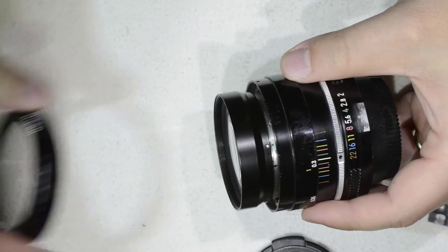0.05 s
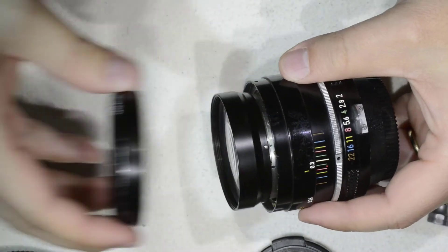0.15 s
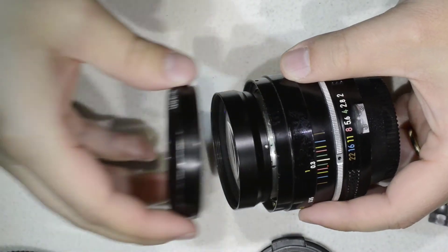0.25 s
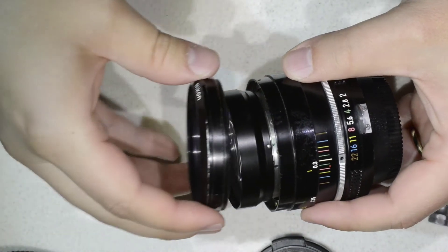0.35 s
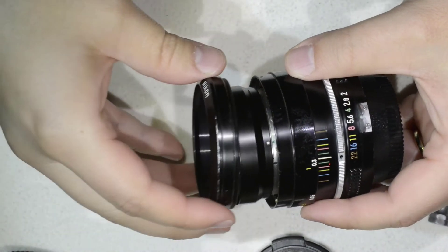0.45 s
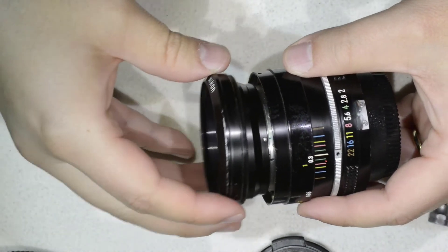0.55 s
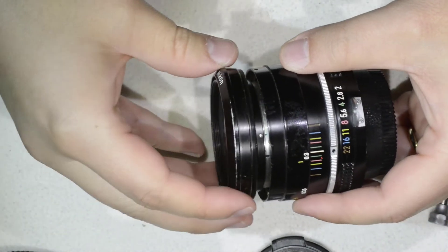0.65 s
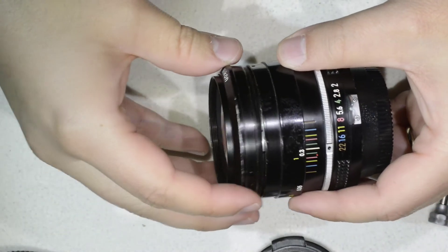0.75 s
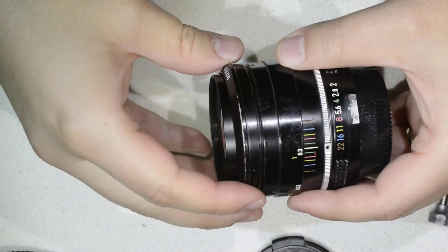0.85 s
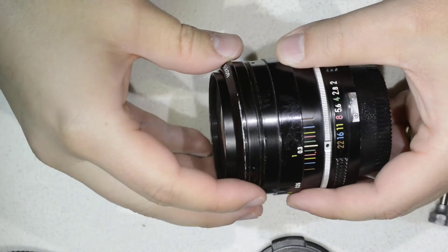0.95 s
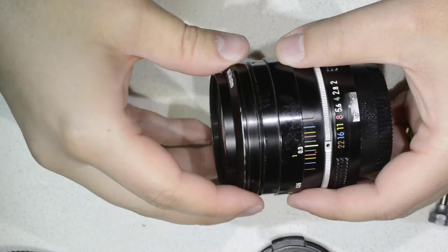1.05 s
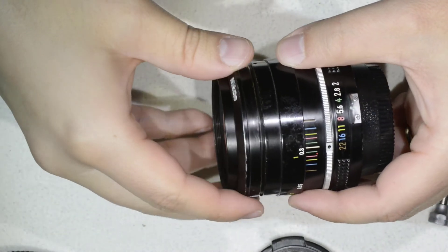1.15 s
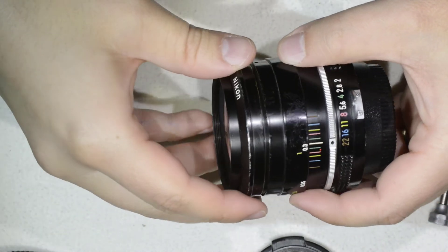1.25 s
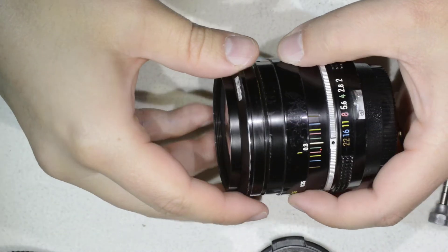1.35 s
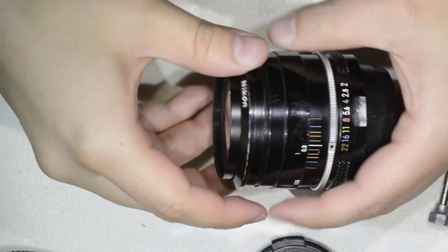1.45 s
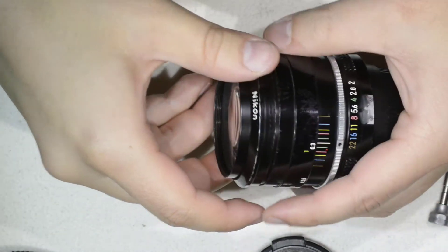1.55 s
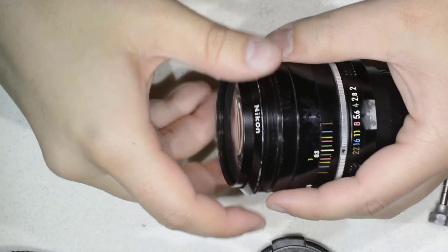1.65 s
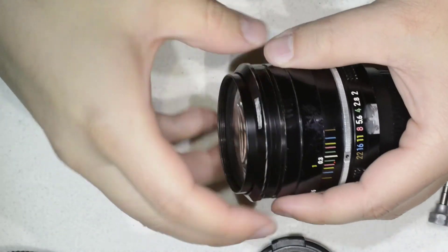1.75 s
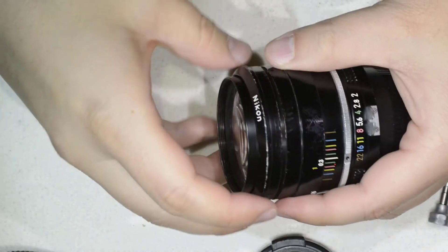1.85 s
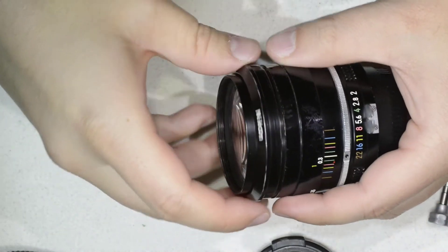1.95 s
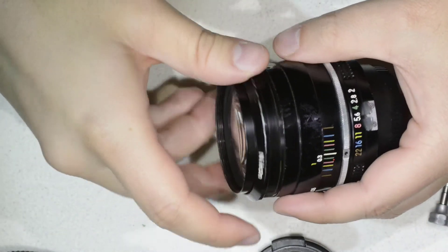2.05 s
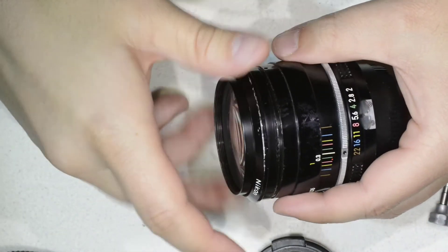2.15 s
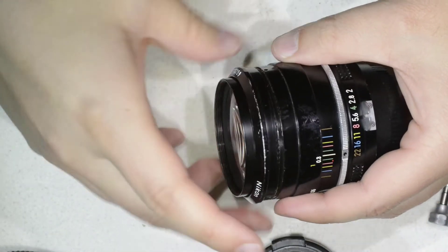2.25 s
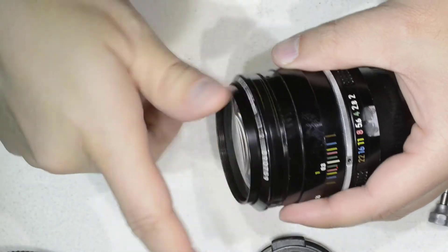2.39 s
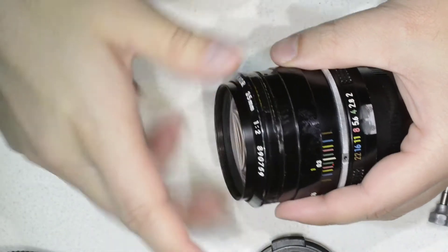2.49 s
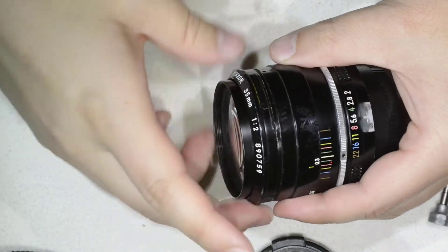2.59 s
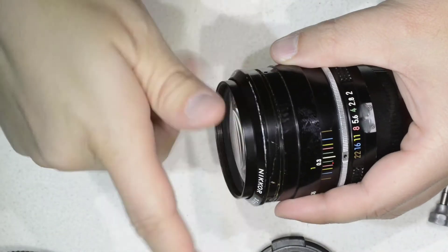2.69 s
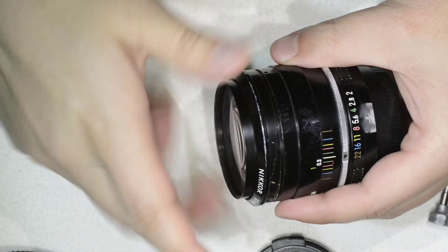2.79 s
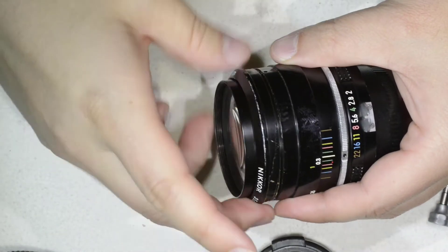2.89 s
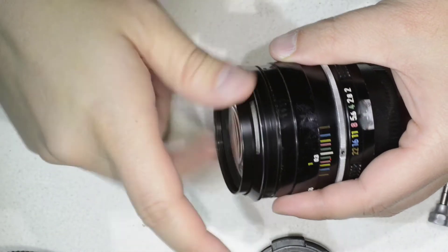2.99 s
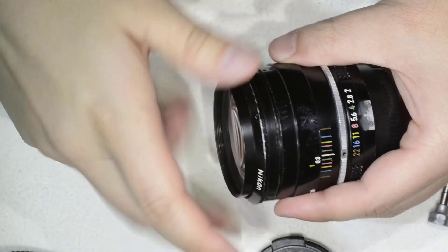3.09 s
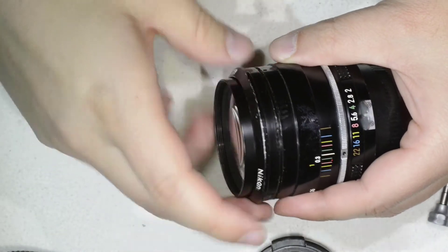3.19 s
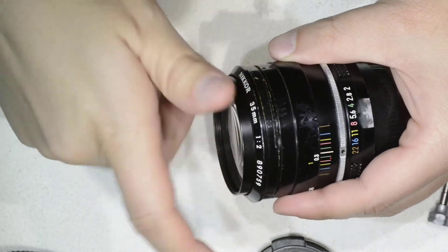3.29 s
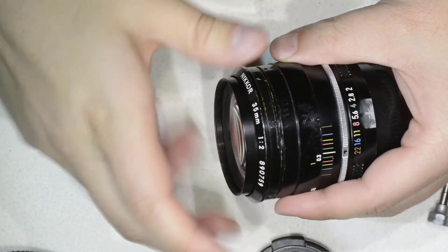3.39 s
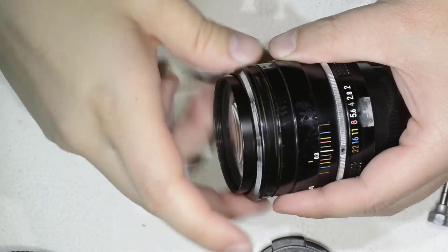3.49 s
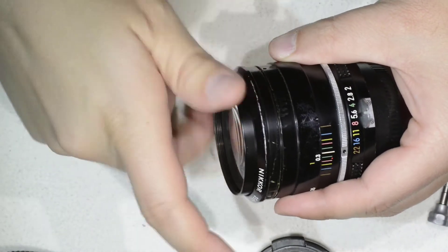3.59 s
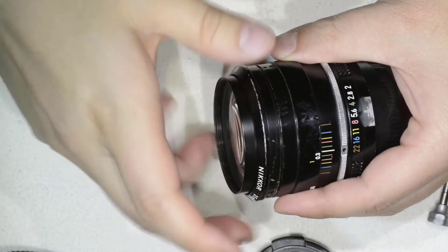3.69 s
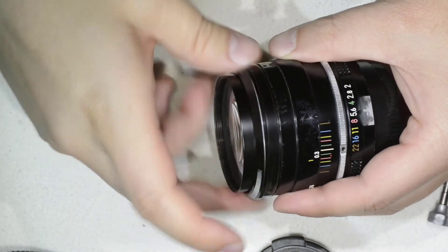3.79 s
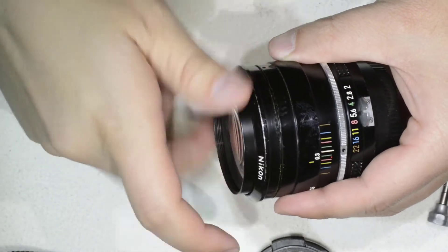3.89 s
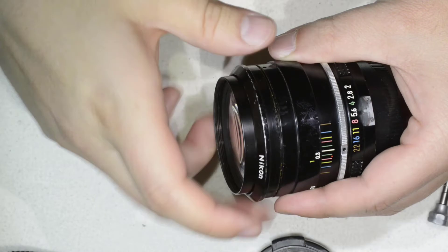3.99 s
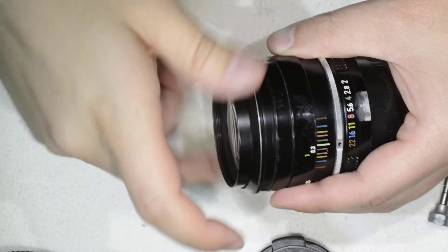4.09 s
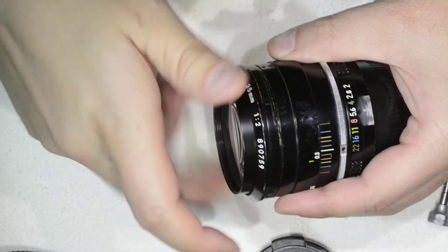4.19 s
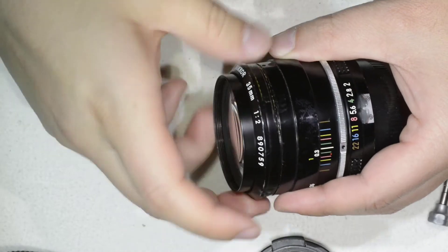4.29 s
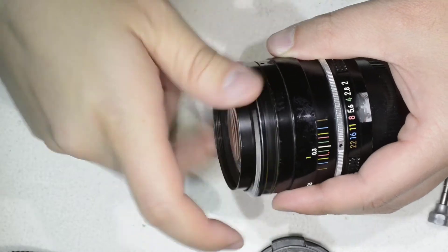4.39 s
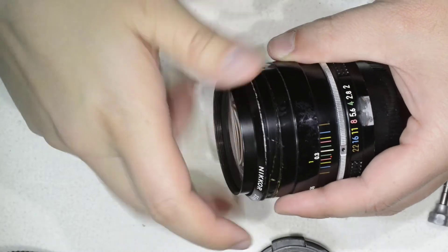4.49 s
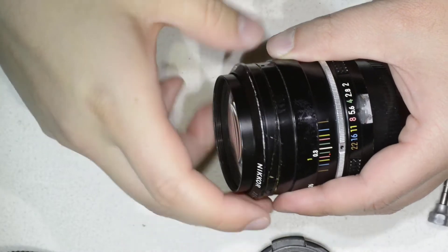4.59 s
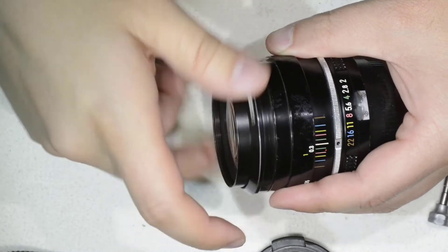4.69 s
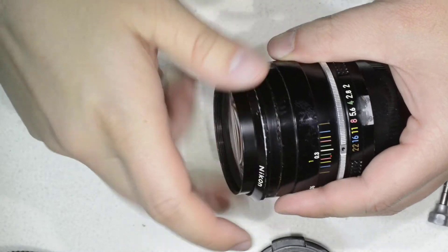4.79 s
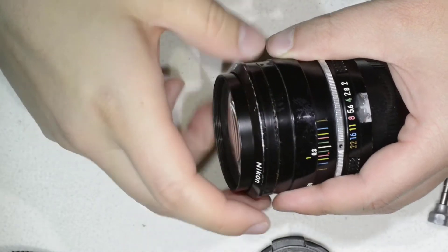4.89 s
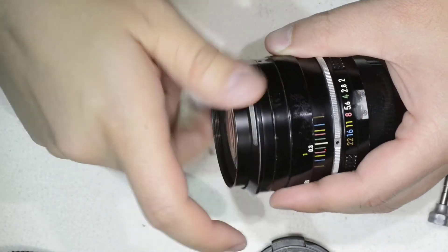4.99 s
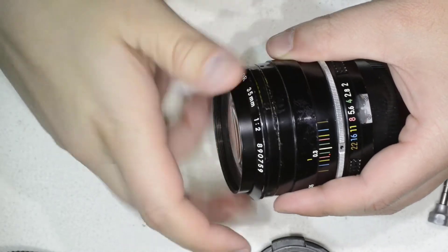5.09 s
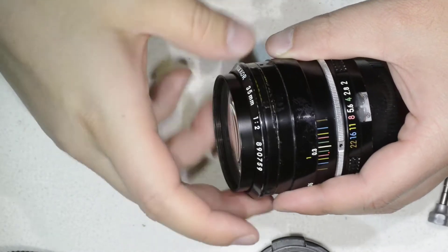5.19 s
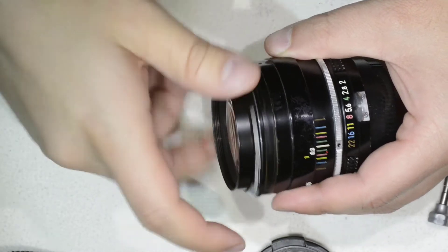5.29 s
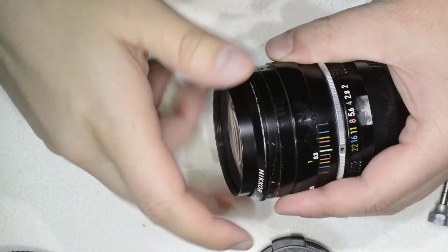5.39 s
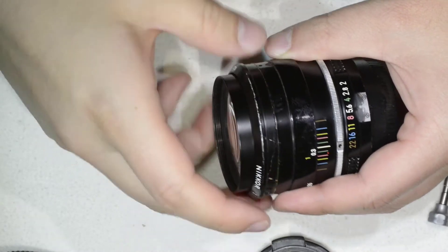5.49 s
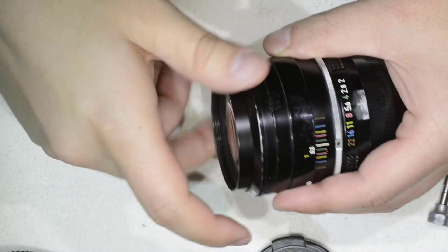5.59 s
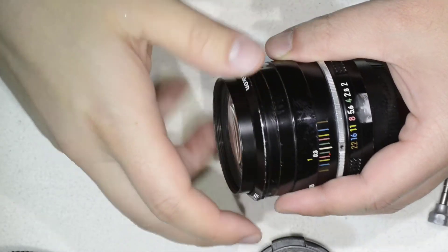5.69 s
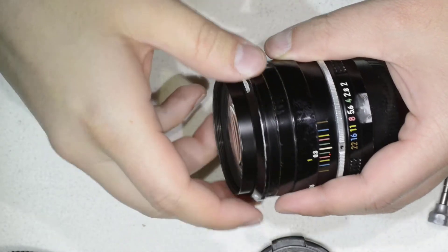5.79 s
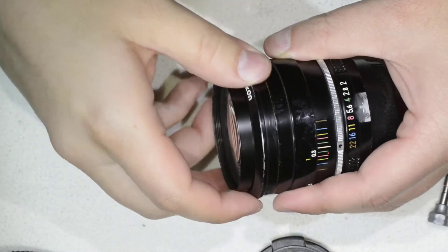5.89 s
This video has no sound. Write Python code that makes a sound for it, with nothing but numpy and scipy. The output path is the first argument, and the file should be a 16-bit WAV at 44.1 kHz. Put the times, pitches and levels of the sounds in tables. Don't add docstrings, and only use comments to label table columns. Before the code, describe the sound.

Short metallic zips jam with sharp rattling clicks as a ring is flicked round on a lens barrel, ending in lighter scrapes.

```python
import sys
import numpy as np
from scipy import signal
from scipy.fft import rfft, irfft, next_fast_len
from scipy.io import wavfile
from scipy.ndimage import uniform_filter1d, map_coordinates

SR = 44100
rng = np.random.default_rng(int(sys.argv[2]) if len(sys.argv) > 2 else 0)


def store_wav(level_fs):
    pcm = np.round(np.clip(np.atleast_2d(level_fs), -1, 1) * 32767)
    wavfile.write(sys.argv[1], SR, pcm.T.astype(np.int16))


def linear_from_db(decibels):
    return 10 ** (np.asarray(decibels, float) / 20)


N = 262251
SIZE = 2 ** 12
HZ = np.fft.rfftfreq(SIZE, 1 / SR)

# mode_hz, width_hz, level_db
SEATED_MODES = [(1704, 220, 0), (2070, 140, 9), (2385, 50, 5), (3340, 130, 0.5), (4040, 69, 2),
                (4650, 300, 2.5), (5500, 340, 4.5), (5460, 280, -9.5), (6790, 260, 3), (8830, 850, 10),
                (9670, 580, -0.5), (12230, 310, 9), (14800, 250, 15)]
HIT_SCATTER = 0.58


def unit(x):
    return x / np.sqrt(np.mean(np.abs(x) ** 2, axis=-1, keepdims=True) + 1e-20)


def along(points, hz):
    f, v = np.transpose(points)
    return np.interp(np.log(hz + 1), np.log(f + 1), v)


def wobble(rate, count):
    knots = rng.standard_normal(int(count * rate / SR) + 4)
    return map_coordinates(knots, [np.arange(count) * rate / SR])


def rush(spectrum, side_db):
    m = next_fast_len(N)
    colour = linear_from_db(along(spectrum, np.fft.rfftfreq(m, 1 / SR)))
    mid, side = irfft(rfft(rng.standard_normal((2, m))) * colour, m)[:, :N]
    return unit(np.array([mid + linear_from_db(side_db) * side, mid - linear_from_db(side_db) * side]))


def background():
    # band_hz, density_db
    rumble_spectrum = [(12, -8.5), (25, -1), (150, -5), (280, -14), (500, -31.5)]
    murmur_spectrum = [(120, -20), (280, -4.5), (460, -3.5), (700, -6), (1500, -25), (3000, -29.5)]
    hiss_spectrum = [(500, -7.5), (1600, -2.5), (4000, -5.5), (8000, -6.5), (12800, 0.5), (16000, -5)]
    # partial_hz, level_db
    hum_partials = [(29.97, -66), (59.94, -70.5), (89.91, -74.5), (119.88, -85.5), (149.85, -79)]
    # centre_s, half_length_s, lift_db
    sweeps = [
        (0.37, 0.22, 8.5),
        (2.502, 0.45, 7.5),
        (4.29, 0.14, 14.5),
    ]
    # start_s, dip_db
    ducks = [
        (2.39, 11.5),
        (2.67, 16),
        (3.27, 6),
        (3.56, 4),
        (3.86, 5.5),
        (4.13, 8.5),
        (4.41, -1),
    ]
    recover_s = 0.13
    t = np.arange(N) / SR
    duck_db = -sum(db * (t > s) * np.exp(-np.abs(t - s) / recover_s) for s, db in ducks)
    sweep_db = sum(db * np.exp(-((t - s) / half) ** 2) for s, half, db in sweeps)
    rumble = linear_from_db(-66.5 + 1.6 * wobble(2.7, N)) * rush(rumble_spectrum, -9)
    murmur = linear_from_db(-78 + sweep_db + 1.0 + 0.55 * wobble(3.9, N)) * rush(murmur_spectrum, -10)
    hum = sum(linear_from_db(db - 1.0 + 2.6 * wobble(2.6, N)) * np.sin(2 * np.pi * hz * t) for hz, db in hum_partials)
    return linear_from_db(duck_db) * (rumble + murmur + hum) + linear_from_db(-67.5) * rush(hiss_spectrum, -1)


def causal(db):
    cep = irfft(np.log(linear_from_db(db) + 1e-6), SIZE)
    cep[1:SIZE // 2] *= 2
    cep[SIZE // 2 + 1:] = 0
    return np.exp(rfft(cep))


def parts(foot_hz, low_hz, high_hz):
    # band_hz, level_db
    metal = [(120, -51.5), (200, -25.5), (440, -18), (968, -13.5), (1560, -11.5), (2910, -5), (3250, 0),
             (3760, -4), (5630, -1), (9060, -10), (14900, -24), (16000, -32.5)]

    def over(hz):
        return -10 * np.log10(1 + (hz / (HZ + 1)) ** 8)

    def under(hz):
        return -10 * np.log10(1 + (HZ / hz) ** 8)

    middle, low, high = over(low_hz) + under(high_hz), over(foot_hz) + under(low_hz), over(high_hz)
    return np.array([causal(along(metal, HZ) + cut) for cut in (middle, low, high)])


def chances(count):
    return rng.standard_normal((count, 2, len(SEATED_MODES)))


def resonance(centre_hz, width_hz, db):
    return linear_from_db(db) * 1j * HZ * width_hz / (centre_hz * centre_hz - HZ * HZ + 1j * HZ * width_hz)


def add(out, s, force, split, ring_db, extra, luck):
    # mode_hz, width_hz, level_db
    loose_modes = [(1925, 290, 34), (3470, 77, 20), (4540, 123, 34.5), (5270, 180, 23), (7000, 130, -32),
                   (8130, 180, 31), (10100, 1300, 26)]
    seated_from_s = 0.72
    modes = np.array(loose_modes if s < seated_from_s else SEATED_MODES)
    luck = luck[:, :len(modes)]
    modes = modes + np.transpose([0.008 * modes[:, 0] * luck[0], 0 * luck[0], 2.2 * luck[1]])
    ring = sum(resonance(*mode) for mode in modes)
    spot = resonance(*extra)
    push = rfft(force, SIZE)
    for row, body in zip(out, (ring + spot, 1.1 * ring + 0.46 * spot)):
        place = row[round(s * SR):][:SIZE]
        response = unit(split * (1 + linear_from_db(ring_db) * body))
        place += irfft(np.sum(push * response, axis=0), SIZE)


def grit(count, rough_db, rate):
    return unit(rng.standard_normal((3, count)) * linear_from_db(rough_db * wobble(rate, count)))


def patchy(x, depth_db):
    z = signal.stft(x, nperseg=256)[2]
    field = rng.standard_normal(z.shape[1:])
    field = uniform_filter1d(uniform_filter1d(field, size=5, axis=0), size=6, axis=1)
    return signal.istft(z * linear_from_db(depth_db * field / field.std()), nperseg=256)[1][:, :N]


def scraping():
    # loudest_s, swell_s, fade_s, scrape_db, base_hz (favoured spot rings
    rubs = [(0.426, 0.089, 0.013, -62, 5000), (0.447, 0.0093, 0.11, -64.5, 4550),
            (0.604, .045, 0.013, -53, 4660), (.632, 0.011, 0.039, -48.5, 4530),
            (.74, 0.037, 0.011, -57, 4650), (1.022, 0.059, 0.03, -48.5, 5480),
            (1.37, 0.13, 0.14, -62, 5500), (1.475, .03, 0.078, -64.5, 3400),
            (1.659, .06, 0.094, -62.5, 4600), (1.754, 0.063, 0.061, -51.5, 4650),
            (1.991, 0.18, 0.17, -60, 5560), (2.096, 0.15, 0.071, -52, 5470),
            (2.272, 0.083, .008, -55, 4000), (2.336, 0.041, 0.032, -35.5, 5000),
            (4.648, 0.043, .06, -37, 4040), (4.96, 0.072, 0.069, -34, 4660),
            (5.285, 0.094, 0.043, -37, 5300), (5.535, 0.048, 0.024, -38, 4650),
            (5.794, 0.024, 0.13, -70.5, 3630)]
    # stop_s, run_up_s, spin_s, scrape_db, base_hz (spot near 1.5 times
    flicks = [
        (2.39, 0.016, .018, -23.5, 4500),
        (2.664, 0.028, 0.03, -29.5, 3384),
        (3.012, 0.043, 0.075, -35.5, 5300),
        (3.258, 0.027, 0.037, -31.5, 4400),
        (3.556, 0.049, 0.042, -35.5, 4800),
        (3.854, 0.051, .046, -31.5, 4500),
        (4.122, 0.061, 0.042, -33, 5300),
        (4.402, 0.042, 0.057, -33.5, 4970),
        (4.72, 0.052, 0.02, -40.5, 5100),
    ]
    stop_s, climb_db, body_db = 0.024, -1, -22
    free_body_db = body_db - 11
    strokes = [(s, rise, spin, stop_s, db, hz, climb_db, body_db) for s, rise, spin, db, hz in flicks]
    strokes += [(s, rise, 0, fall, db, hz, 0, free_body_db) for s, rise, fall, db, hz in rubs]
    out, split = np.zeros((2, N + SIZE)), parts(230, 1377, 8320)
    hop = SR // 40
    fade = signal.get_window("hann", 2 * hop)
    t = np.arange(-12 * hop, 8 * hop) / SR
    for s, rise, spin, fall, db, hz, climb, low_db in strokes:
        away = np.maximum(np.maximum((-t - spin) / rise, t / fall), 0)
        progress = np.clip(0.5 + t / max(spin, 1e-3), -0.5, 0.5)
        touch_db = db - 24 * away ** 1.356 + climb * progress
        level_db = touch_db + 1.3 * wobble(80, len(t))
        low_part_db = low_db - 0.2278 * (touch_db + 41.5)
        high_part_db = -3 - 0.2174 * (touch_db + 48.5)
        gains = linear_from_db(level_db - 1.5 + np.array([0 * t, low_part_db, high_part_db]))
        force = np.clip(4 - 3 * away, 0, 1) * gains * grit(len(t), 1.8, 300)
        for k, luck in zip(range(0, len(t) - hop, hop), chances(count=19)):
            piece = force[:, k:k + 2 * hop]
            if np.abs(piece[0]).max() <= 1e-4:
                continue
            free_db = np.clip(-0.6 * (touch_db[k:k + 2 * hop].max() + 42), 0, 13)
            spot_hz = hz * (1.5 + 0.08 * (free_db < 5) * luck[1, -1])
            spot = (spot_hz, 240, 6.5 + 0.92 * free_db)
            add(out, s + t[k], fade * piece, split, free_db - 8.0, spot, 1.3 * luck)
    return patchy(out[:, :N], depth_db=2.6)


def chatter(rise, hold, fall):
    t = np.arange(2048) / SR
    swell = np.clip(t / max(rise, 1e-4), 0, 1) ** 0.76
    stop_db = -60 * np.clip(t - hold, 0, 1) / fall
    sag_db = -5.7 * np.clip(t - rise, 0, 1) / max(hold, 1e-3)
    shape = swell * linear_from_db(stop_db + sag_db)
    force = shape * grit(len(t), 0.2, 700)
    return force * np.linalg.norm(shape) / np.linalg.norm(force, axis=1, keepdims=True)


def taps():
    # start_s, peak_db, barrel_db, sheen_db, strongest_hz
    finger_taps = [(.4295, -33.5, -30, -30, 4600), (.4324, -54, -32, -25, 4570),
                   (.4528, -50, -26, -8, 4540), (.5954, -55, -6, 9, 4740), (.621, -27.5, -8, -4, 4540),
                   (.6698, -56.5, -8, 21.5, 10000), (.7516, -29.5, -11, -36, 4700),
                   (.7808, -26, -19, -11.5, 5800), (1.0351, -11, -12, -30, 5500),
                   (1.3467, -52, -8, -5, 5600), (1.4653, -45, -31, -19, 5560),
                   (1.4868, -54.5, -31, -11, 5430), (2.0797, -35.5, -31, -14, 5660),
                   (2.2406, -53.5, 0, -9.5, 2070), (2.2772, -28, -9.5, -24, 5200),
                   (2.5925, -50, 0.5, -6, 3130), (3.1766, -33.5, -14, -15, 5690),
                   (3.7234, -19.5, -3.5, -7, 2020), (3.9995, -19.5, -12, -25, 5840),
                   (4.2857, -38.5, 1.5, -24.5, 3260), (4.5797, -50.5, 1, -15.5, 3200),
                   (4.8743, -49.5, 3.5, -14, 3160), (5.1479, -24.5, -16, -8, 4900),
                   (5.47, -50.5, -0.5, -17, 2135)]
    out, split = np.zeros((2, N + SIZE)), parts(1700, 2200, 11000)
    lead = SR // 100
    lead_swell = linear_from_db(np.linspace(-38, -19, lead))
    for (s, db, barrel_db, sheen_db, hz), luck in zip(finger_taps, chances(len(finger_taps))):
        gains = linear_from_db(db - 6.5 + np.array([[0], [barrel_db], [sheen_db]]))
        hold_s = 0.0055 * linear_from_db(-0.18 * (db + 35))
        knock = chatter(0.0008, hold_s, 0.016)
        force = np.hstack([lead_swell * grit(lead, 1.4, 400), knock])
        add(out, s - lead / SR, gains * force, split, -0.8, (hz, 250, 11), HIT_SCATTER * luck)
    return out[:, :N]


def thuds():
    # start_s, peak_db,
    # pitch_hz, t60_s
    body_knocks = [(0.425, -61, 686, 0.031), (1.035, -42, 763, 0.018), (2.159, -68.5, 430, 0.1),
                   (2.392, -44.5, 832, 0.026), (2.672, -40, 451, 0.035), (2.961, -49.5, 765, 0.059),
                   (2.985, -41.5, 730, 0.017), (3.012, -46, 720, 0.015), (3.272, -50.5, 455, 0.058),
                   (3.561, -31, 658, 0.015), (3.564, -28, 440, 0.018), (3.858, -39, 650, 0.034),
                   (4.13, -42, 401, 0.031), (4.286, -54.5, 480, 0.027), (4.331, -51.5, 506, 0.03),
                   (4.407, -36, 450, 0.032), (5.536, -51.5, 764, 0.036),
                   (0.427, -58, 1110, 0.027),
        (1.0362, -35, 1180, 0.012),
        (4.6352, -56, 1070, 0.049),
        (5.1472, -51.5, 1146, 0.017),
                   (1.0365, -42, 2015, 0.069),
        (3.7234, -39, 1560, .03),
        (0.7806, -27.5, 1970, 0.008),
        (5.1492, -43, 2080, 0.017),
        (5.917, -42.5, 2023, 0.018),
        (5.9344, -56, 2050, 0.03),
    ]
    out, t = np.zeros(N + SR), np.arange(SR // 8) / SR
    for s, db, hz, t60 in body_knocks:
        shape = (1 - np.exp(-t / 0.0024)) * linear_from_db(-60 * t / t60)
        blur = 1 + 0.25 * wobble(220, len(t)) + 0.6j * wobble(390, len(t))
        tone = np.imag(blur * np.exp(2j * np.pi * hz * t))
        out[round(s * SR):][:len(t)] += linear_from_db(db + 7.5) * shape * tone
    return out[:N]


def jams():
    # start_s, peak_db, sheen_db, chatter_s, strongest_hz
    thread_jams = [(2.3485, -16, -11, .0065, 5500), (2.365, -20, -6, 0.0081, 4540),
                   (2.393, -8, -0.5, 0.0096, 6070), (2.6693, -4, -5, .0095, 3260),
                   (3.0174, -13, -5, 0.015, 4670), (3.2628, -12.5, -6, 0.024, 3960),
                   (3.2733, -3.5, 0, 0.0064, 6060), (3.485, -32, -25, 0.016, 5550),
                   (3.5027, -24.5, -32, 0.033, 5570), (3.56, -4.5, -5, 0.0055, 3274),
                   (3.859, -3.5, -3.5, 0.01, 2850), (4.1259, -16.5, 3, 0.01, 3370),
                   (4.1311, -5, -4, 0.0073, 6030), (4.4063, -8.5, -0.5, 0.014, 2920),
                   (4.6451, -29, -1.5, 0.022, 3180), (4.699, -43.5, -26.5, 0.025, 5470),
                   (4.7254, -19.5, -3.5, .01, 4400), (4.9909, -27.5, -5.5, 0.0047, 4600),
                   (5.002, -25.5, -16, 0.0081, 3270), (5.5266, -30, -9, 0.014, 5470)]
    out, split = np.zeros((2, N + SIZE)), parts(300, 1300, 8490)
    for (s, db, sheen_db, hold, hz), luck in zip(thread_jams, chances(len(thread_jams))):
        gains = linear_from_db(db - 10.5 + np.array([[0], [-24], [sheen_db]]))
        add(out, s, gains * chatter(0.004, hold, 0.038), split, -2.5, (hz, 350, 7), HIT_SCATTER * luck)
    return out[:, :N]


def room(x):
    # band_hz, t60_s
    room_decay = [(500, 0.075), (2000, 0.18), (6000, 0.21), (12000, 0.11)]
    out, step = np.zeros((2, N + SR)), SR // 4
    for start in range(0, N, step):
        hz, t, z = signal.stft(rng.standard_normal((2, SR // 3)), SR, nperseg=256)
        decay = linear_from_db(-60 * t / along(room_decay, hz)[:, None])
        late = linear_from_db(-24.5 - 60 * t / 0.5)
        tail = signal.istft(z * (decay + late), SR, nperseg=256)[1]
        wet = signal.fftconvolve(x[None, start:start + step], tail / np.linalg.norm(tail[0]), axes=1)
        out[:, start + 260:][:, :wet.shape[1]] += wet
    return out[:, :N]


def later(x, delays):
    m = next_fast_len(N + 1024)
    phase = np.exp(-2j * np.pi * np.fft.rfftfreq(m, 1 / SR) * np.array(delays)[:, None])
    return irfft(rfft(x, m) * phase, m)[:, :N]


def scene():
    near, lingering = scraping() + taps() + jams()
    direct = later(near, [0, 32e-6]) * linear_from_db([[0.7], [-0.7]])
    bench = linear_from_db(-33) * later(near, [0.00052, 0.00046])
    knocks = thuds()
    answer = linear_from_db(-8.5) * room(lingering + knocks)
    return direct + bench + knocks * linear_from_db([[1.6], [-1.6]]) + answer + background()


def low_pass(x):
    return signal.sosfilt(signal.butter(12, 15830, fs=SR, output="sos"), x)


def record(dry):
    # band_hz, gain_db
    side_gain = [(100, 0.5), (500, 3), (2500, -3), (8000, -1), (14000, -3.5)]
    m = next_fast_len(N)
    mid = (dry[0] + dry[1]) / 2
    side = irfft(rfft(dry[0] - mid, m) * linear_from_db(along(side_gain, np.fft.rfftfreq(m, 1 / SR))), m)[:N]
    pair = np.array([mid + side, mid - side])
    pair = pair / (1 + np.abs(pair / 0.62) ** 4) ** (1 / 4)
    return low_pass(pair)


dry = scene()
out = record(dry)
store_wav(out)
```